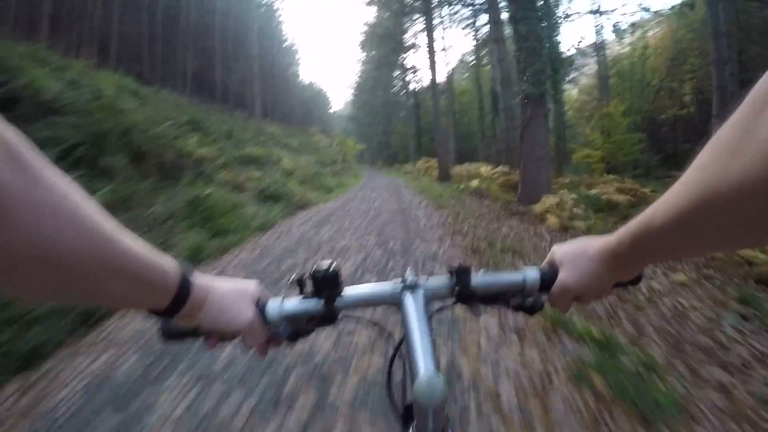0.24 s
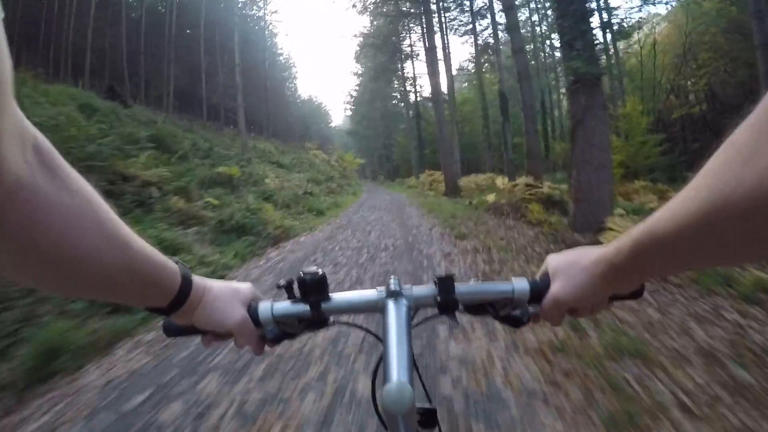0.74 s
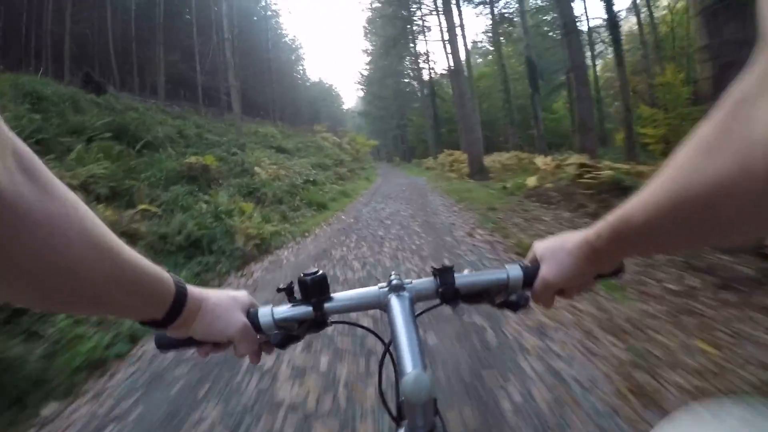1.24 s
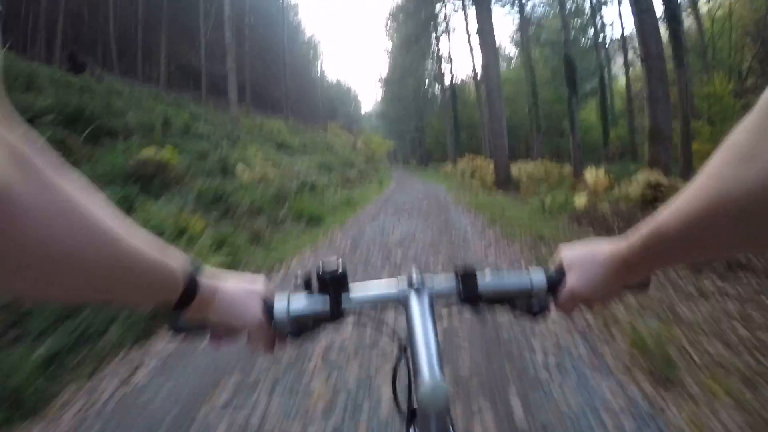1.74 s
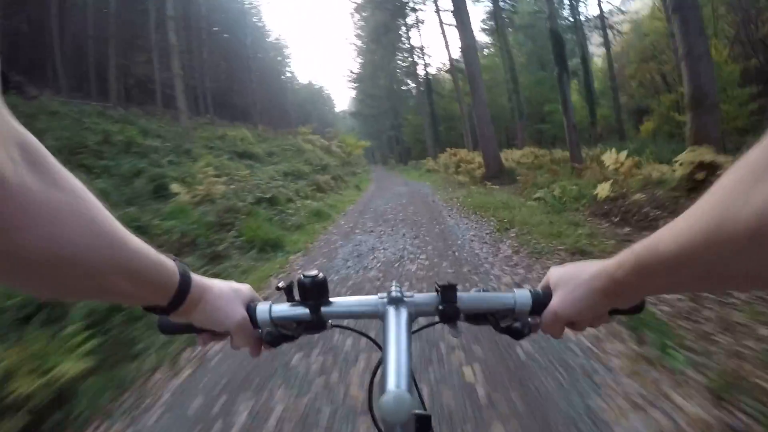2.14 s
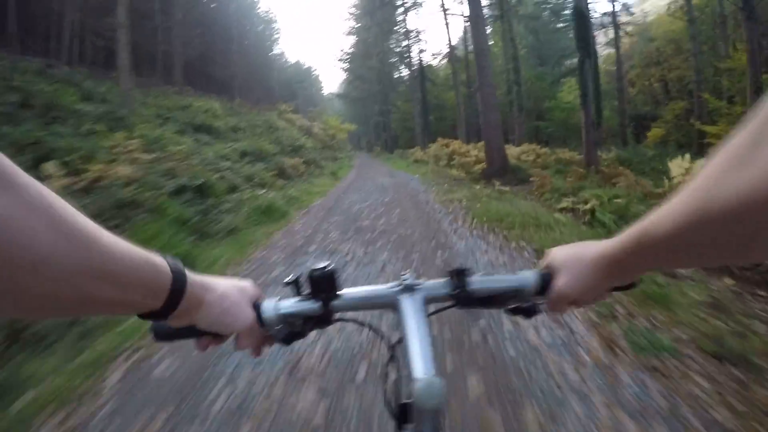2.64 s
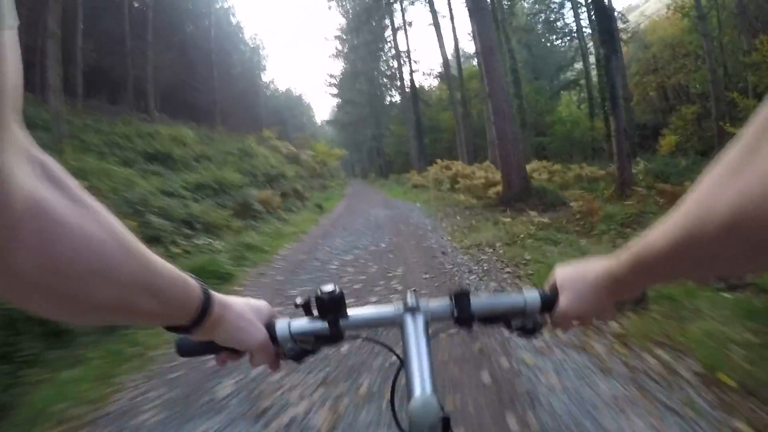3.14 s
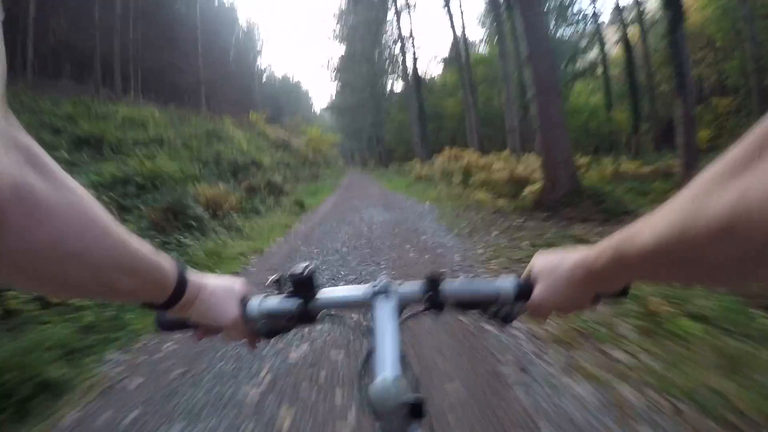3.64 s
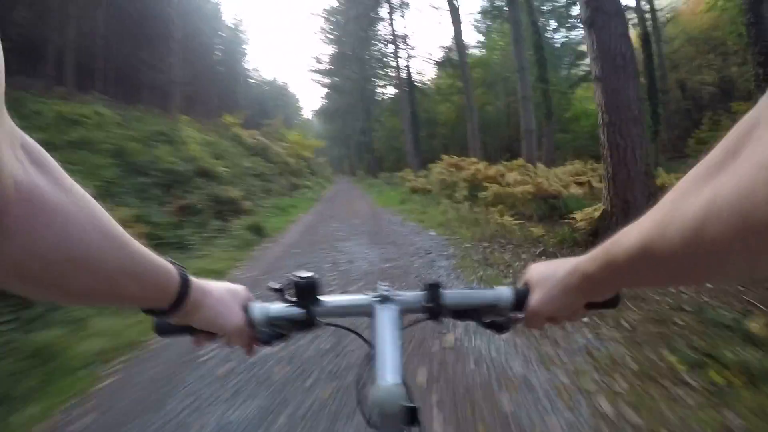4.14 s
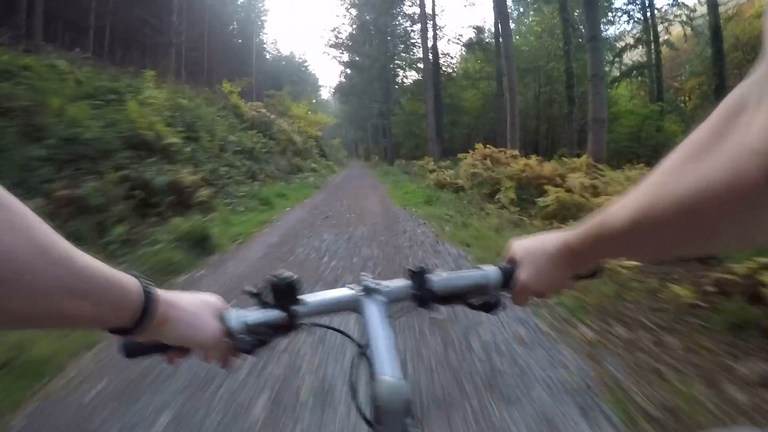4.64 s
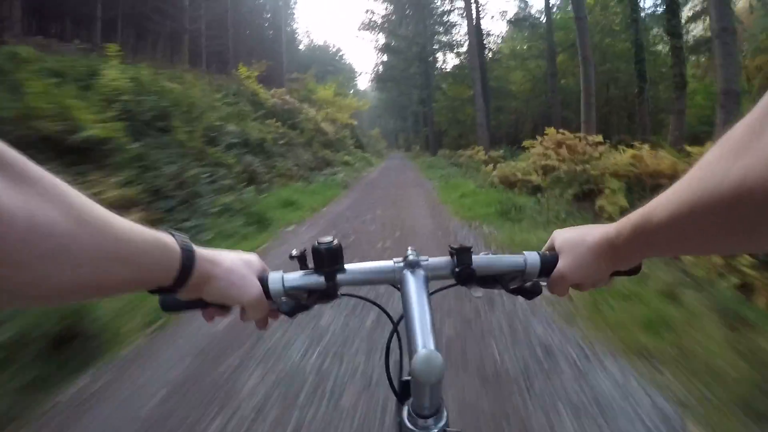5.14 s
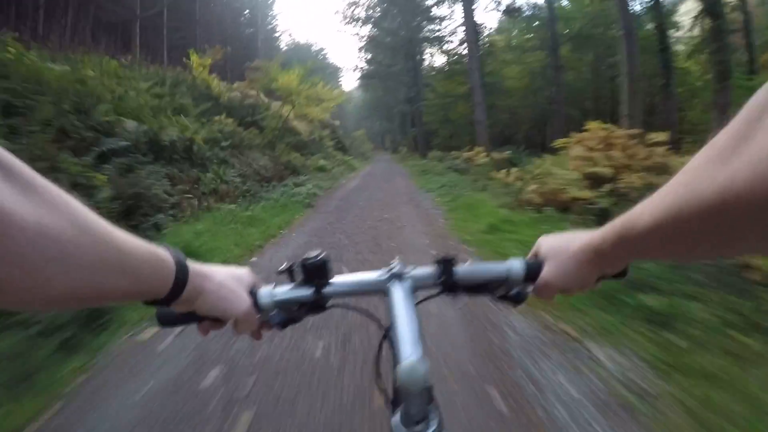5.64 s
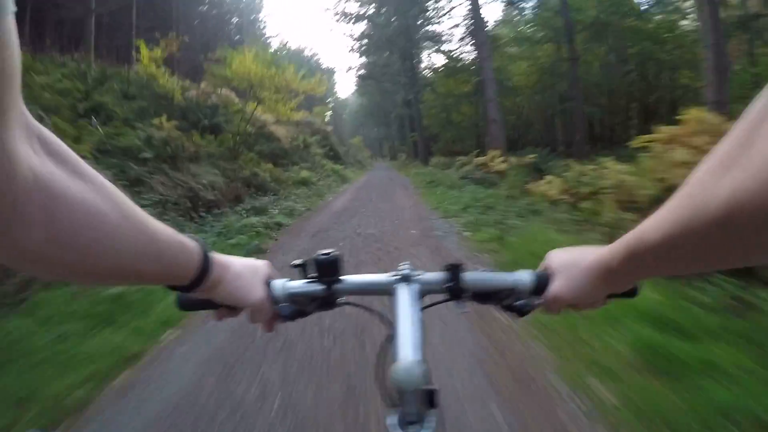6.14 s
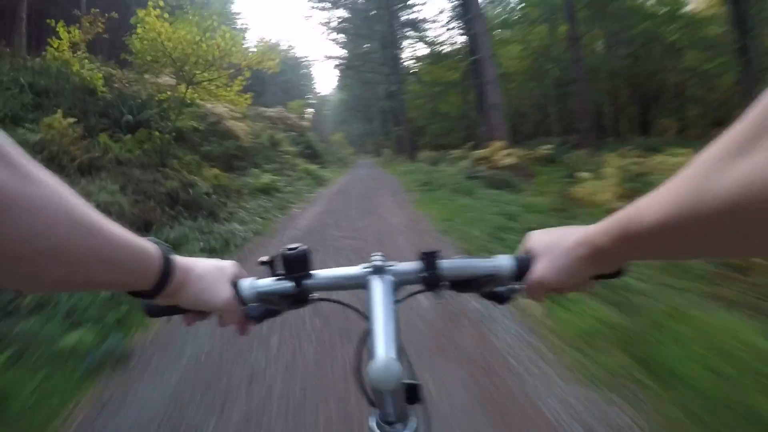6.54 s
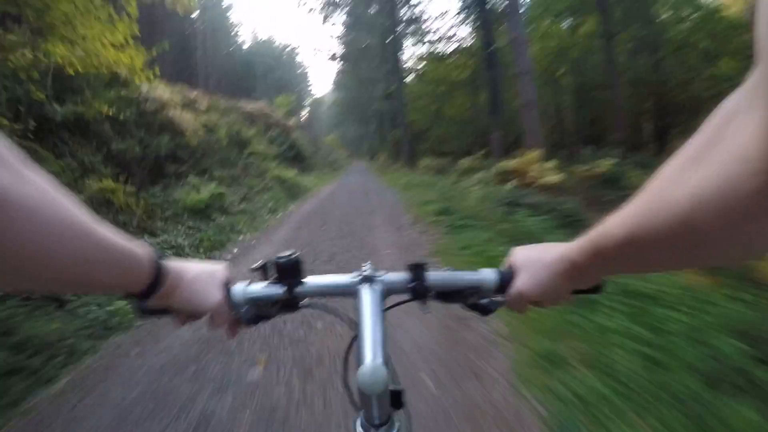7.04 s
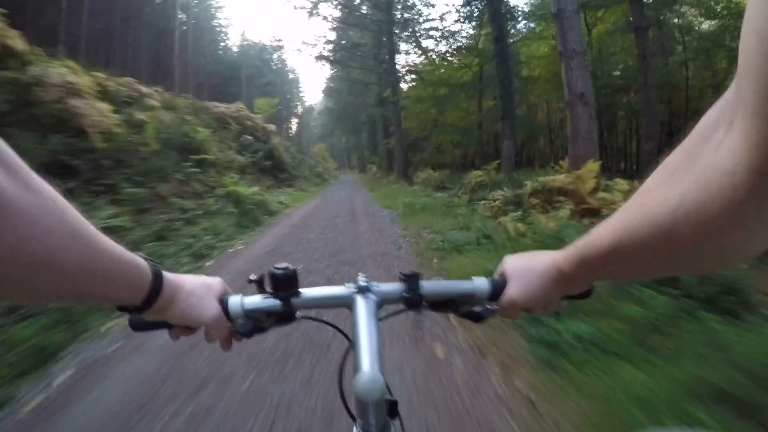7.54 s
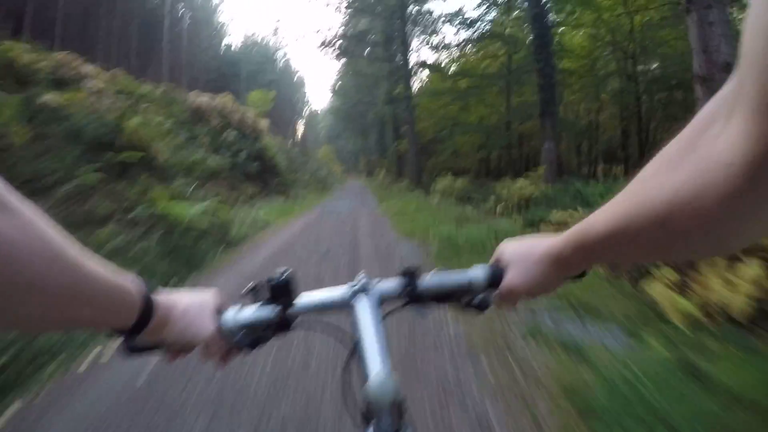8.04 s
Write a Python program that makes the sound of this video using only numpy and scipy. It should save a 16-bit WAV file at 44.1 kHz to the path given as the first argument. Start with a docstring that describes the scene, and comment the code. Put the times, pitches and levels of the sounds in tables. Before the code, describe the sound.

Bicycle tyres crunch steadily over a gravel forest track, stones snapping sharply, with occasional frame knocks and metal rattles under low gusting wind buffets.

```python
"""Bicycle on a gravel track

Heard from a camera on the rider's chest: tyres crunch gravel, more in loose patches; clicks ring in its case.
Grains of filtered random clicks make the gravel; struck modes and noise bursts make knocks, clinks and thuds.
A wheel throbs once a turn, the casings drum, and filtered noise surging in gusts buffets the microphone."""
import sys
import numpy as np
from scipy import signal
from scipy.fft import rfft, irfft
from scipy.io import wavfile
from scipy.ndimage import uniform_filter1d

SR = 44100
rng = np.random.default_rng(int(sys.argv[2]) if len(sys.argv) > 2 else 0)


def to_wav(sig):
    """Store sig (one row per channel, or 1-D mono) as 16-bit WAV at the path in sys.argv[1].

    Samples outside -1..1 are clipped; the rate is SR.
    """
    pcm = np.clip(np.atleast_2d(sig), -1, 1) * 32767
    pcm = np.round(pcm).astype(np.int16)
    wavfile.write(sys.argv[1], SR, pcm.T)  # frames by channels


N = 365148
T = np.arange(N) / SR
STRIKE_N = 6000  # samples in a struck sound
GRAIN_N = 1024  # samples in a grain


def undb(db):
    """Decibels to gain."""
    return 10 ** (np.asarray(db) / 20)


def unit(x):
    """Scale to rms 1."""
    return x / np.sqrt(np.mean(x ** 2))


def peaked(x):
    """Scale to peak 1."""
    return x / np.abs(x).max()


def noise(size):
    """White noise of rms 1."""
    return rng.standard_normal(size)


def curves(table):
    """Each column of a table as a line through time."""
    time_s, *columns = np.transpose(table)
    return [np.interp(T, time_s, column) for column in columns]


def walk(rate_hz):
    """Random levels held 1 / rate_hz and slewed; rms 1."""
    hold_n = max(int(SR / rate_hz), 1)
    steps = np.repeat(noise(N // hold_n + 1), hold_n)
    return unit(uniform_filter1d(steps, hold_n)[:N])


def swell(middle_s, length_s):
    """A smooth rise and fall, length_s wide at half height."""
    return np.exp(-np.log(2) * np.minimum((2 * (T - middle_s) / length_s) ** 2, 100))


def response(points, resonances=(), size=1024):
    """Causal impulse response of a smooth spectrum with resonant humps."""
    f_hz = np.maximum(np.arange(size // 2 + 1) * SR / size, 1)
    hz, db = np.transpose(points)
    gain_db = np.interp(np.log(f_hz), np.log(hz), db)
    for centre_hz, width_hz, lift_db in resonances:
        gain_db = gain_db + lift_db / (1 + (2 * (f_hz - centre_hz) / width_hz) ** 2)
    # fold the cepstrum: minimum phase
    cepstrum = irfft(np.log(undb(gain_db)))
    cepstrum[1:size // 2] *= 2
    cepstrum[size // 2 + 1:] = 0
    return irfft(np.exp(rfft(cepstrum)))


def through(x, ir):
    """Pass a sound through an impulse response."""
    return signal.fftconvolve(x, ir)[:len(x)]


def fade(t60_s, size=STRIKE_N):
    """An exponential decay, 60 dB in t60_s."""
    return np.exp(-np.log(1000) * T[:size] / t60_s)


def ring(hz, t60_s):
    """One struck mode: a decaying sine."""
    return np.sin(2 * np.pi * hz * T[:STRIKE_N]) * fade(t60_s)


def grain(hz, cycles, size=GRAIN_N):
    """A rounded contact: it swells for some cycles and dies away."""
    age = T[:size] * hz / cycles
    return np.sin(2 * np.pi * hz * T[:size]) * age * np.exp(1 - age)


def add(out, start_s, sound):
    """Mix a sound in at start_s."""
    i = max(int(start_s * SR), 0)
    out[i:i + len(sound)] += sound[:max(N - i, 0)]


def clicks(per_s, spread_db, most_db):
    """Random contacts: very many small ones, a few large."""
    size_db = np.minimum(spread_db * rng.exponential(size=N), most_db)
    hit = rng.random(N) < per_s / SR
    return hit * rng.choice([-1, 1], N) * undb(size_db)


def pebbles(low_hz, high_hz, per_s, cycles, spread_db, most_db, bunch_db, count):
    """Stones of count sizes, each clicking at its own pitch in its own little bunches."""
    total = np.zeros(N)
    for hz in np.geomspace(low_hz, high_hz, count):
        contacts = clicks(per_s / count, spread_db, most_db) * undb(bunch_db * walk(110))
        total += unit(through(contacts, grain(hz, cycles)))
    return total


# surface under the tyres, before trims and lifts: time_s, small_db, coarse_db, grit_db, sand_db
SURFACE = [(0.05, -45.5, -53, -58, -69), (0.39, -45, -52.5, -60, -68.5), (1.39, -45.5, -51.5, -58.5, -69.5),
           (1.83, -42, -46.5, -56, -66.5), (2.29, -44, -47.5, -55, -66.5), (2.58, -42.5, -44, -56, -64),
           (2.79, -42, -44.5, -57, -65.5), (3.2, -46.5, -48.5, -54.5, -64), (3.64, -46, -51.5, -57, -69),
           (4.32, -44, -53, -61.5, -68.5), (4.91, -45.5, -44, -56.5, -64), (5.07, -45.5, -47, -53.5, -61),
           (5.53, -45.5, -49, -63, -70.5), (6.29, -39, -48.5, -58, -69), (6.7, -43, -51.5, -62.5, -73),
           (7.17, -43, -50, -62, -71), (7.81, -45, -53, -64, -71), (8.25, -46.5, -49.5, -65.5, -73)]
# loose patches: middle_s, length_s, gravel_lift_db, grit_lift_db
LOOSE_PATCHES = [(0.445, 0.21, 2.5, 0.5), (1.501, 0.03, 6.5, 1), (1.725, 0.02, 7, 6.5),
                 (2.25, 0.053, 8.5, 6.5), (2.502, 0.023, 7, 3), (3.39, 0.27, 8, 1), (3.698, 0.11, 8, 7.5),
                 (4.026, 0.13, 8, 1.5), (4.445, .1, 1.5, -2), (4.627, 0.048, 6, 5), (4.775, 0.075, 6, -3),
                 (5.324, 0.15, 5.5, 0.5), (5.562, 0.13, 5, 9.5), (5.833, 0.12, 3, 5.5),
                 (6.698, 0.081, 3.5, 5), (7.05, 0.061, 2, 5.5)]
# fine gravel spectrum: freq_hz, gain_db
GRIT_SPECTRUM = [(1000, -30), (3000, 18), (4600, -1), (5100, -3), (5700, 1.5), (6300, 0.5), (6900, -2),
                 (8000, -4.5), (8650, 1), (9700, -9.5), (11800, -14.5), (12900, -10.5), (15000, -2)]


def tyres(case, wander_db=1.4):
    """Gravel crunches in clusters as the tread bites, more in loose patches; grit and sand spit with it."""
    small_db, coarse_db, grit_db, sand_db = curves(SURFACE)
    small_trim_db, coarse_trim_db, grit_trim_db, sand_trim_db = -2, -1.03, 1, 0.5
    loose_db = wander_db * walk(11)
    gravel_db, spray_db = loose_db, .5 * loose_db
    for middle_s, length_s, gravel_lift_db, grit_lift_db in LOOSE_PATCHES:
        patch = swell(middle_s, length_s)
        gravel_db = gravel_db + gravel_lift_db * patch
        spray_db = spray_db + grit_lift_db * patch
    bite = 0.42 * walk(45) + 1.1 * walk(150)
    small = pebbles(3120, 3960, per_s=560, cycles=0.85, spread_db=1.0, most_db=8.5, bunch_db=0.0, count=6)
    coarse = pebbles(1618, 2740, per_s=680, cycles=0.92, spread_db=1.5, most_db=10, bunch_db=0.4, count=7)
    grit = pebbles(4410, 8700, per_s=9000, cycles=1.22, spread_db=2.5, most_db=15.5, bunch_db=4.0, count=5)
    sand = pebbles(9900, 12300, per_s=4600, cycles=1.85, spread_db=2.0, most_db=24, bunch_db=1.5, count=3)
    small = unit(through(small, case) * undb(1.55 * bite))
    coarse = unit(through(coarse, case) * undb(2.17 * bite))
    fine_filter = response(GRIT_SPECTRUM)
    grit = unit(through(grit, fine_filter) * undb(1.8 * bite))
    sand = unit(through(sand, fine_filter) * undb(1.8 * bite))
    gravel = small * undb(small_db + small_trim_db) + coarse * undb(coarse_db + coarse_trim_db)
    spray = grit * undb(grit_db + grit_trim_db) + sand * undb(sand_db + sand_trim_db)
    return gravel * undb(gravel_db) + spray * undb(spray_db)


# large stones snapping from under the tread: time_s, peak_db, pitch_hz, swell_cycles (few: dry crack, more: ping)
STONE_SNAPS = [(0.0287, -27.5, 3490, 1), (0.142, -31, 3600, 1.9), (0.2046, -25, 3500, 0.54),
               (0.5017, -25.5, 3550, 0.81), (1.0708, -24.5, 3480, 0.82), (1.074, -22.5, 3300, 0.61),
               (1.4552, -26.5, 3770, 0.69), (1.5867, -16.5, 3500, 0.68), (1.601, -24, 3480, 0.34),
               (1.655, -29.5, 3600, 1.1), (1.7668, -16, 3830, 0.88), (1.768, -23.5, 1720, 0.5),
               (1.7912, -26, 3400, 0.49), (2.076, -26, 3600, 0.65), (2.2017, -23.5, 3660, 0.51),
               (2.2143, -17, 2110, 0.22), (2.359, -25, 3530, 0.72), (2.5486, -24, 3460, 0.63),
               (2.5745, -29, 2140, 0.89), (2.586, -22.5, 3470, 1.1), (2.776, -19, 3260, 0.41),
               (2.794, -25, 3400, 0.38), (2.9645, -23, 3400, 0.91), (2.967, -12.5, 3370, 0.67),
               (2.994, -25, 3380, 0.42), (3.161, -26.5, 3290, 0.97), (3.172, -27, 2180, .7),
               (3.271, -21.5, 3450, 0.24), (3.341, -20.5, 3600, 0.41), (3.3627, -24, 3280, 0.41),
               (3.4608, -21.5, 3420, 0.57), (3.7118, -24.5, 3530, 1.3), (3.726, -25.5, 3580, 1.4),
               (3.9092, -27.5, 3570, 0.67), (3.9837, -16, 3700, 1.1), (4.0574, -26, 3500, 1.4),
               (4.087, -24, 3690, .8), (4.096, -26, 3400, 0.74), (4.2055, -22.5, 3020, 0.76),
               (4.4505, -26.5, 3650, .9), (4.4762, -25.5, 3640, 0.76), (4.7265, -26, 3540, 0.5),
               (4.7754, -14.5, 2940, 0.88), (4.8988, -17.5, 1900, 0.39), (4.9777, -23, 3400, 0.4),
               (5.334, -25, 3500, .8), (5.362, -15, 3180, .9), (5.3835, -25, 3480, 0.9),
               (5.577, -28, 3470, 0.64), (5.6544, -26.5, 3500, 1.1), (5.774, -28, 2400, .6),
               (5.799, -24, 3680, 1.4), (5.874, -23, 3770, 1.2), (5.91, -20.5, 3570, 0.66),
               (5.916, -25, 3600, 1.1), (5.9611, -22, 3170, 0.99), (6.0369, -18.5, 3800, 0.77),
               (6.0587, -16, 3360, 0.59), (6.1228, -21, 3450, 0.51), (6.1943, -23.5, 3530, 0.71),
               (6.234, -28, 3480, 0.64), (6.3083, -16.5, 3630, .7), (6.334, -22.5, 2580, 0.76),
               (6.4043, -17, 3150, 0.53), (6.4255, -24, 3740, 1.5), (6.4446, -24, 3450, 0.95),
               (6.46, -22.5, 3640, 0.88), (6.4703, -27, 3500, 1.1), (6.4786, -24, 3670, 1),
               (6.4962, -13.5, 3150, 1.04), (6.6897, -25.5, 3620, 1), (6.6977, -24, 3600, 1.1),
               (6.708, -22.5, 3650, 1.4), (6.757, -19, 3700, 0.86), (6.7836, -21, 3570, 0.99),
               (6.9697, -22, 3430, 0.31), (7.0579, -28, 3740, 1), (7.0694, -27, 3640, 1),
               (7.1247, -27, 3490, 0.89), (7.1448, -28, 2170, 0.6), (7.162, -28, 3550, .8),
               (7.2003, -25, 3450, 0.77), (7.216, -18.5, 3760, 0.8), (7.248, -23.5, 3560, 0.77),
               (7.278, -18, 3350, 0.84), (7.3362, -23.5, 3560, 0.96), (7.3761, -27, 3470, 1),
               (8.0591, -23.5, 3530, 0.65)]
# snap spectrum: freq_hz, gain_db
SNAP_SPECTRUM = [(500, -14), (950, -6.5), (1350, -2), (1700, 1), (15000, -1)]


def stones(case, grate_s=0.0016, grate_db=-22, edge_db=-3):
    """A pinched stone grates, snaps free with a sharp edge and rings briefly at its own pitch."""
    out = np.zeros(N)
    lead_s = .003  # grating before the snap
    grating = np.exp(-np.abs(T[:GRAIN_N] - lead_s) / grate_s)
    snap_filter = through(case, response(SNAP_SPECTRUM))
    for time_s, peak_db, pitch_hz, swell_cycles in STONE_SNAPS:
        crack = undb(grate_db) * noise(GRAIN_N) * grating
        crack[int(lead_s * SR)] += 1
        stone = grain(pitch_hz, swell_cycles)
        stone[0] += undb(edge_db)
        snap = through(through(crack, stone), snap_filter)
        add(out, time_s - .0024, undb(peak_db) * peaked(snap))
    return out


def strays(case, small_hz=3560, coarse_hz=2200, pitch_spread=0.089, cycles=0.92, edge_db=10,
           small_lift_db=16, coarse_lift_db=14, count=800):
    """Middling stones tick singly, each at its own pitch, harder ones sharper; levels follow the surface."""
    out = np.zeros(N)
    small_db, coarse_db, _, _ = curves(SURFACE)
    coarse_share, range_db = .35, 11
    for when, kind, size, hardness in rng.random((count, 4)):
        i = int(when * N)
        if kind < coarse_share:
            hz, most_db = coarse_hz, coarse_db[i] + coarse_lift_db
        else:
            hz, most_db = small_hz, small_db[i] + small_lift_db
        detune = np.exp(pitch_spread * rng.standard_normal())
        stone = grain(hz * detune, cycles * (1.5 - hardness))
        stone[0] += undb(edge_db) * hardness
        tick = through(stone, case)
        add(out, T[i], undb(most_db - range_db * np.sqrt(size)) * peaked(tick))
    return out


def flung_grit(level_db=3.0):
    """Sharp grains fly off the tread and tick against the bike, louder where the track is sandy or loose."""
    _, _, _, sand_db = curves(SURFACE)
    for middle_s, length_s, _, grit_lift_db in LOOSE_PATCHES:
        sand_db = sand_db + grit_lift_db * swell(middle_s, length_s)
    ticks = pebbles(5100, 14000, per_s=170, cycles=0.27, spread_db=11.0, most_db=8, bunch_db=1.0, count=4)
    return unit(through(ticks, response(GRIT_SPECTRUM))) * undb(sand_db + level_db)


# sharpest chips striking the bike: start_s, peak_db (before trim), pitch_hz
CHIP_HITS = [(0.0727, -42, 8770), (0.4085, -41, 8520), (0.4314, -37, 6400), (0.802, -41, 9000),
             (0.817, -44, 10000), (0.872, -45, 12000), (0.9887, -46, 12000), (1.7155, -38, 6210),
             (2.413, -41, 6420), (2.506, -30, 6340), (3.3298, -42, 7620), (3.392, -40, 8810),
             (4.9, -38, 12500), (4.9332, -37, 7000), (4.9385, -33, 12500), (5.2001, -43, 8600),
             (5.4116, -43, 12000), (5.8088, -44, 8600), (5.9599, -48, 9820), (7.0424, -46, 8760),
             (7.7753, -30, 7500)]


def chips(cycles=0.72, scrape_t60_s=0.021, scrape_db=-14, trim_db=0.5):
    """A flung chip of grit clicks on the metal and skitters for an instant."""
    out = np.zeros(N)
    for start_s, peak_db, pitch_hz in CHIP_HITS:
        contact = undb(scrape_db) * noise(GRAIN_N) * fade(scrape_t60_s, size=GRAIN_N)
        contact[0] += 1
        tick = through(contact, grain(pitch_hz, cycles))
        add(out, start_s, undb(peak_db + trim_db) * peaked(tick))
    return out


# hard knocks on the frame: start_s, ring_peak_db, body_db (re ring), pitch_factor (on the modes)
FRAME_KNOCKS = [(2.207, -28, -19, 0.83), (3.025, -23.5, -7.5, 0.91), (4.357, -30, -16, 0.87),
                (5.349, -35, 5, 1), (5.374, -36, -3, 0.67), (5.384, -38, -7, 0.74),
                (5.8093, -17.5, -2.5, 1), (6.04, -44, 7.5, 1), (6.53, -31.5, -8.5, 0.93),
                (6.74, -28, -17, 0.85), (6.7417, -36.5, -12, 0.63), (8.212, -37, -6, 1)]
# frame modes: freq_hz, gain_db, t60_s
FRAME_MODES = [(364, -13, 0.035), (510, -16, 0.047), (692, -17, 0.2), (960, -21, 0.017),
               (2020, 16.5, 0.019), (2146, -2.5, 0.073), (2320, 14.5, 0.017)]
# hollow body spectrum: freq_hz, gain_db
BODY_SPECTRUM = [(120, -34), (250, -7.5), (350, -4), (520, -8.5), (750, -13), (1100, -29), (2000, -2)]


def knocks(chatter_db=-37, chatter_t60_s=0.068, judder_db=-14, judder_t60_s=0.099, rise_s=0.00052):
    """A hard blow rings the frame's modes while its hollow body judders for a moment."""
    out = np.zeros(N)
    hollow = response(BODY_SPECTRUM)
    onset = 1 - np.exp(-T[:STRIKE_N] / rise_s)
    for start_s, ring_peak_db, body_db, pitch_factor in FRAME_KNOCKS:
        modes = sum(undb(gain_db) * ring(hz * pitch_factor, t60_s) for hz, gain_db, t60_s in FRAME_MODES)
        blow = undb(chatter_db) * noise(STRIKE_N) * fade(chatter_t60_s)
        judder = undb(judder_db) * noise(STRIKE_N) * fade(judder_t60_s)
        blow[0] += 1
        judder[0] += 1
        knock = peaked(through(blow, modes * onset))
        body = peaked(through(judder, hollow))
        add(out, start_s, undb(ring_peak_db) * (knock + undb(body_db) * body))
    return out


# loose fitting clinking: start_s, peak_db, edge_db (noise gain beside the mode gains)
FITTING_CLINKS = [(4.3789, -25, -6), (4.3814, -21.5, -4), (7.581, -23.5, -7), (7.7747, -23.5, 8)]
# fitting modes: freq_hz, gain_db, t60_s
FITTING_MODES = [(3380, 5, 0.047), (3820, 7, 0.032), (4150, 0, 0.021), (5200, -18, 0.01), (9000, -9, 0.074),
                 (11100, -30, 0.019)]


def clinks(edge_t60_s=0.023):
    """A fitting is jolted against its stop: a crisp noise edge over a short bright modal ring."""
    out = np.zeros(N)
    modes = sum(undb(gain_db) * ring(hz, t60_s) for hz, gain_db, t60_s in FITTING_MODES)
    for start_s, peak_db, edge_db in FITTING_CLINKS:
        bright_noise = np.diff(noise(STRIKE_N + 1)) / 2
        clink = modes + undb(edge_db) * bright_noise * fade(edge_t60_s)
        add(out, start_s, undb(peak_db) * peaked(clink))
    return out


# metal parts rattling: start_s, level_db (rms before the decay), t60_s
RATTLE_BURSTS = [(0.647, -38, 0.025), (0.99, -40, .015), (1.635, -50, .02), (2.612, -37, 0.022),
                 (2.941, -31.5, 0.056), (3.023, -35.5, 0.18), (3.808, -34.5, 0.04), (4.379, -36, 0.03),
                 (4.898, -29, 0.018), (4.932, -33.5, 0.055), (4.939, -30.5, 0.11), (7.583, -36.5, 0.042),
                 (7.775, -30, 0.049)]


def rattles():
    """Chain and fittings chatter: bright decaying noise bursts coloured by the metal."""
    out = np.zeros(N)
    metal = response([(400, -16), (1300, 0.0), (1900, 13.5), (3000, 6.0), (3550, 17.0), (4400, 4.5),
                      (6000, 0.5), (7000, -3.5), (8800, -4.5), (12000, -18.5), (15000, -25)])
    for start_s, level_db, t60_s in RATTLE_BURSTS:
        chatter = unit(through(noise(STRIKE_N), metal))
        add(out, start_s, undb(level_db) * chatter * fade(t60_s))
    return out


# bumps through the mount: start_s, peak_db, pitch_hz (settled), t60_s
MOUNT_THUDS = [(1.188, -36, 84.4, 0.11), (2.264, -35, 69.6, 0.12), (2.609, -39, 111, 0.13),
               (2.954, -40, 105, 0.081), (3.384, -34, 91, .08), (3.661, -32, 105, 0.089),
               (3.715, -36, 110, 0.095), (4.152, -32, 138, 0.045), (4.705, -30.5, 55, 0.12),
               (5.351, -29, 112, 0.095), (6.042, -22, 95, 0.038), (8.214, -36, 106, 0.023)]


def bumps(contact_s=0.0047, shudder_db=-16, stiffen=0.33, relax_s=0.0056):
    """Ruts thud and shudder through the mount, falling in pitch as it relaxes."""
    out = np.zeros(N)
    age_s = T[:STRIKE_N]
    mount = response([(40, 9.0), (120, 16.0), (250, -27), (600, -14), (2000, -48)])
    for start_s, peak_db, pitch_hz, t60_s in MOUNT_THUDS:
        shudder = undb(shudder_db) * unit(through(noise(STRIKE_N), mount)) * fade(2 * t60_s)
        falling_hz = pitch_hz * (1 + stiffen * np.exp(-age_s / relax_s))
        tone = np.sin(2 * np.pi * np.cumsum(falling_hz) / SR) * fade(t60_s)
        thud = (tone + shudder) * (1 - np.exp(-age_s / contact_s))
        add(out, start_s, undb(peak_db) * peaked(thud))
    return out


def wheel(throb_hz=40, cycles=0.68, level_db=-30, scatter_db=2, first_s=.16, turn_s=.3485):
    """A slightly uneven wheel sends a soft throb through the rider once a turn."""
    out = np.zeros(N)
    for start_s in np.arange(first_s, N / SR, turn_s):
        size, detune = rng.standard_normal(2)
        throb = grain(throb_hz * np.exp(0.15 * detune), cycles, size=8192)
        add(out, start_s, undb(level_db + scatter_db * size) * throb)
    return out


# rolling rumble: time_s, level_db (before trim)
ROLL_LEVEL = [(0.05, -62), (.75, -62.5), (1.1, -61), (1.4, -65), (1.6, -61.5), (2.85, -60.5), (3.03, -56.5),
              (3.4, -58), (3.85, -61.5), (4.8, -58), (4.92, -54), (5.2, -57.5), (5.8, -57), (6.25, -62),
              (6.5, -59), (7.7, -60.5), (8.25, -56.5)]
# rumble spectrum: freq_hz, gain_db
ROLL_SPECTRUM = [(100, -5.5), (220, 1), (330, 6), (400, 1), (500, 0.5), (600, -2.5), (1050, -1.5),
                 (1500, -2), (3000, -23.5)]


def rolling(trim_db=0.5):
    """The tyre casings drum dully on the uneven ground: random clicks through a low resonance."""
    level_db, = curves(ROLL_LEVEL)
    drum = through(clicks(2500, spread_db=3.0, most_db=13.5), response(ROLL_SPECTRUM, size=2048))
    return unit(drum * undb(2.13 * walk(30))) * undb(level_db + trim_db)


# gusts over the headwind: middle_s, length_s, buffet_lift_db, eddy_lift_db
WIND_GUSTS = [(0.172, 0.042, 9, 9), (0.523, 0.081, 11, 9), (0.868, 0.057, 12.5, 2), (1.12, 0.096, 3, 3.5),
              (1.24, 0.19, 3, 5.5), (1.572, 0.21, 7.5, 5), (1.895, 0.12, 8, 2), (2.063, 0.16, 8.5, -2),
              (2.303, 0.17, 7.5, 6.5), (2.57, 0.22, 9, 5.5), (2.998, 0.14, 10.5, 5), (3.204, 0.23, 9, 4.5),
              (3.35, 0.12, 4, 4), (3.464, 0.15, 7, 2), (3.69, 0.18, 0.5, 9), (4.0, 0.12, -0.5, 11),
              (4.274, 0.17, 1.5, 5.5), (4.476, 0.18, 8.5, 7), (4.722, 0.092, 7.5, 5), (5.03, 0.24, 6, 9),
              (5.45, 0.42, 6, 5.5), (5.645, 0.08, 11, -4), (5.818, .16, 10, 6.5), (6.052, 0.18, 4, 6),
              (6.52, 0.16, 8.5, 8.5), (6.802, 0.057, 10.5, 9), (7.122, 0.23, 8.5, -2),
              (7.215, .17, -0.5, 13), (7.331, 0.059, 9.5, -1), (7.51, 0.11, 8, 11), (7.835, 0.07, 6, 9),
              (8.187, 0.1, 6, 10.5)]
# slow buffeting spectrum: freq_hz, gain_db
BUFFET_SPECTRUM = [(5, -19.5), (14, 0.5), (20, 2.5), (30, -2), (45, -16.5), (65, -30), (120, -54),
                   (300, -76)]
# small eddy spectrum: freq_hz, gain_db
EDDY_SPECTRUM = [(30, -16.5), (58, 3.5), (80, -2.5), (115, -5.5), (160, -18), (230, -26.5), (500, -58),
                 (1500, -68)]


def wind(lull_buffet_db=-31.5, lull_eddy_db=-50.5, flutter_db=2.3):
    """Slow pressure swings from the headwind with smaller eddies on top; gusts change both levels."""
    buffet_db, eddy_db = lull_buffet_db, lull_eddy_db
    for middle_s, length_s, buffet_lift_db, eddy_lift_db in WIND_GUSTS:
        gust = swell(middle_s, length_s)
        buffet_db = buffet_db + buffet_lift_db * gust
        eddy_db = eddy_db + eddy_lift_db * gust
    buffet = unit(through(noise(N), response(BUFFET_SPECTRUM, size=32768)))
    # successive vortices are of similar strength, so the gusts set the swell
    strength = np.sqrt(uniform_filter1d(buffet ** 2, size=3000) + 1e-6)
    buffet = unit(buffet / strength)
    eddies = through(noise(N), response(EDDY_SPECTRUM, size=16384))
    eddies = unit(eddies * undb(flutter_db * walk(25)))
    return buffet * undb(buffet_db) + eddies * undb(eddy_db)


# stone spectrum: freq_hz, gain_db
STONE_SPECTRUM = [(200, -43), (600, -3.5), (950, 8.5), (1200, -3), (1650, 0), (3800, -2.5), (4400, 0.5),
                  (6300, 6), (10000, -18), (15000, -14)]
# camera case resonances: centre_hz, width_hz, lift_db
CASE_RESONANCES = [(1314, 49, 13), (1578, 203, 7.5), (1837, 284, 12.5), (2097, 214, 7), (2556, 544, 12),
                   (2960, 75, 5.5), (3352, 263, 13), (3574, 195, 10.5), (3765, 223, 14), (4090, 92, 8)]


def scene():
    """All sources summed dry, in the open air; the gravel and stones ring in the case."""
    case = response(STONE_SPECTRUM, CASE_RESONANCES)
    gravel = tyres(case) + stones(case) + strays(case) + flung_grit() + chips()
    bike = knocks() + clinks() + rattles() + bumps() + wheel() + rolling()
    return (gravel + bike + wind())[None]


def record(dry, top_hz=15150):
    """The camera cuts the top of the treble with a steep low-pass."""
    treble_cut = signal.ellip(10, .2, 80, top_hz, fs=SR, output="sos")
    return signal.sosfilt(treble_cut, dry)


dry = scene()
out = record(dry)
to_wav(out)
```